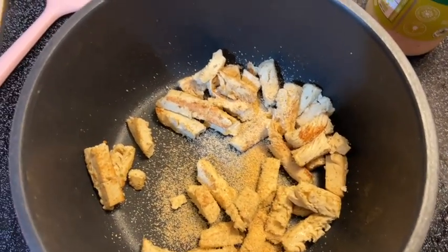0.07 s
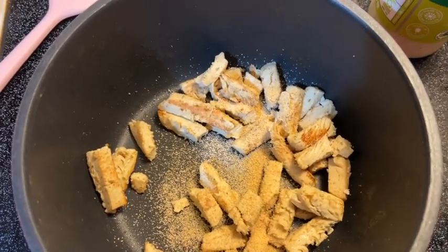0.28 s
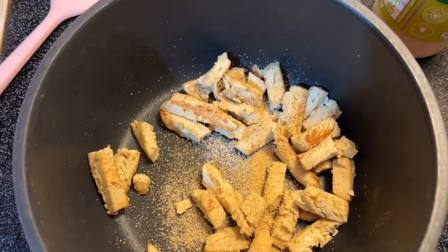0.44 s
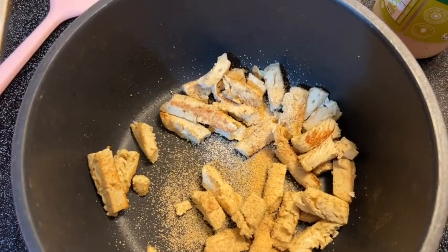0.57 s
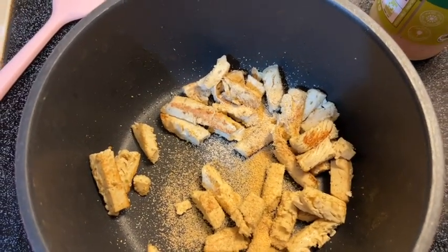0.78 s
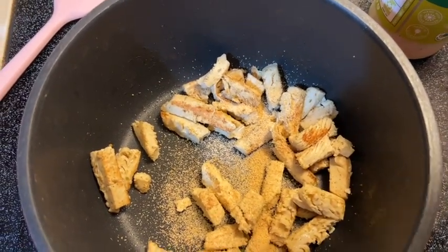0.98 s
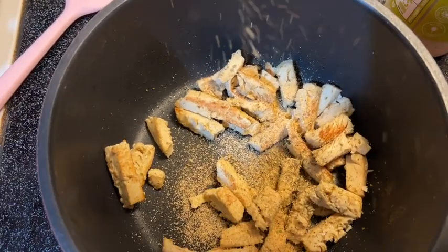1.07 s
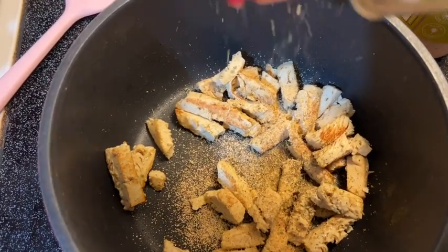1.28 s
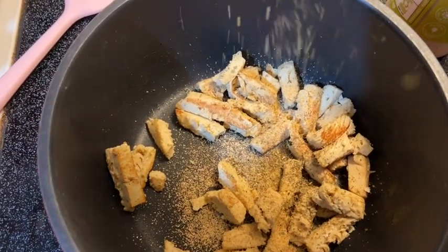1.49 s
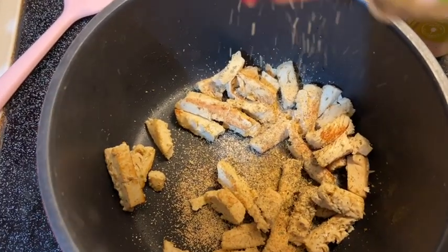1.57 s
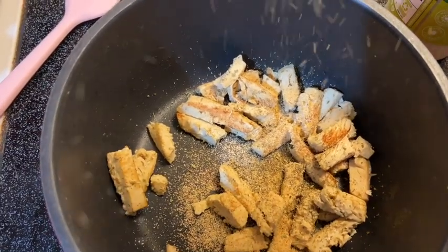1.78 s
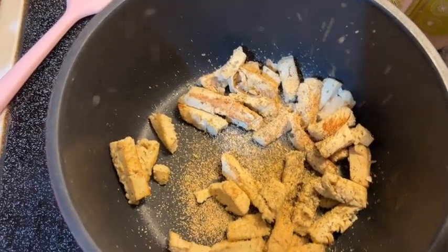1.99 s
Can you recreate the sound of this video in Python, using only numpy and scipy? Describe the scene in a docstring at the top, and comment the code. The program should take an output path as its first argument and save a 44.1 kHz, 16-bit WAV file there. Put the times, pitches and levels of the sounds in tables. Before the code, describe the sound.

Spice pours from a plastic shaker into a pan with a steady bright hiss and small grain ticks, after a jar knocks hard on the counter and a lid snaps open; close stereo microphone, small kitchen.

```python
"""Spice poured in a small kitchen

Close stereo microphone. A jar is set down on the counter and rocks: decaying counter modes, thuds, cracks.
A plastic shaker clicks and its lid snaps open (short noise bursts); spice slides inside, then pours into
a pan: showers of random impulses give a steady hiss and a later patter, with single ticks of coarse grains.
A small kitchen answers with a short noise tail, over quiet air and a faint low sine hum of uneven level."""
import sys
import numpy as np
from scipy import signal
from scipy.fft import rfft, irfft, next_fast_len
from scipy.io import wavfile
from scipy.ndimage import uniform_filter1d, map_coordinates

SR = 44100
rng = np.random.default_rng(int(sys.argv[2]) if len(sys.argv) > 2 else 0)


def store_wav(level_fs):
    """Save 16-bit WAV to argv[1]."""
    pcm = np.round(np.clip(np.atleast_2d(level_fs), -1, 1) * 32767)
    wavfile.write(sys.argv[1], SR, pcm.T.astype(np.int16))


N = 90404  # length in samples

# Colours below are relative: each sound's overall level is set apart from its colour.
# Pour: flow out of the shaker [t/s, level/dB before stream or patter gain]
POUR_FLOW = [(1.065, -79.5), (1.084, -51.5), (1.108, -42.5), (1.149, -46), (1.301, -46), (1.4, -47),
             (1.5, -46.5), (1.68, -47.5), (1.801, -47), (2.04, -47.5)]
# Colour of the falling stream [f/Hz, level/dB]
STREAM_COLOUR = [(200, -54), (1200, -49), (1600, -28.5), (2400, -19.5), (3300, -4.5), (4300, -12),
                 (4900, -8), (5400, -1.5), (6300, -4.5), (7800, 0.5), (9000, -2), (11300, 1.5),
                 (12600, -2.5), (15500, -3)]
# Colour of spice landing in the pan [f/Hz, level/dB]
PATTER_COLOUR = [(50, -3), (250, 8), (750, 2.5), (950, -11), (1200, -33.5), (1500, -1.5), (2300, 5.5),
                 (3200, -6.5), (6000, -27)]
STREAM_DB, PATTER_DB = 3.5, -26  # gains on the flow
FALL_S = 0.1  # delay from shaker to pan
STREAM_PATCHY_DB, PATTER_PATCHY_DB, SURGE_DB = 1.9, 6.5, 0.4
GRAINS_PER_S, GRAIN_SPREAD_DB = 22000, 1  # per channel; mean of the size spread before its cap

# Spice sliding in the shaker [t/s, length/s, level/dB, wall rustle/dB before trim, release t60/s]
SLIDES = [(0.46, 0.01393, -49.5, -6, 0.089), (0.487, 0.034, -50, 5, 0.12), (0.703, 0.0324, -47.5, 3, .08),
          (1, 0.031, -44.5, -3.5, 0.047), (1.031, .034, -50.5, 1.5, 0.012), (1.198, .05, -53, 7, 0.094),
          (1.257, 0.036, -56.5, 4, .09), (1.402, 0.027, -58.5, 0.5, 0.049), (1.452, 0.014, -52, -3, .06),
          (1.781, 0.01, -59, -3.5, .06), (1.994, 0.044, -68, 14, .08), (2.035, .03, -55.5, 15, 0.072)]
# Colour of the sliding spice [f/Hz, level/dB]
SLIDING_COLOUR = [(1000, -35), (2200, -3.5), (3300, 1), (4900, -6), (6500, -0.5), (8000, 1), (11000, -3.5),
                  (13000, -22), (15500, -25.5)]
# Colour of the rustling shaker wall [f/Hz, level/dB]
WALL_COLOUR = [(100, -22), (350, -0.5), (750, 5), (1150, -10.5), (1600, 5), (2600, -12), (5000, -12),
               (10000, -51)]
SLIDE_RISE_S, SLIDE_SAG_DB_PER_S = 0.008, 64.5  # the spice loses speed as it slides
SLIDE_CLUMP_DB, WALL_TRIM_DB = 1.5, -8.5

# Coarse grains striking plastic [t/s, level/dB, tilt/dB per octave]
TICKS = [(.4728, -32, 4), (.4932, -29, -2), (.5178, -28, 4), (1.0069, -32, 0), (1.0093, -30, 0),
         (1.1082, -34, 0), (1.1346, -28.5, 1), (1.1736, -34, 3), (1.1912, -33, 2), (1.2046, -34, -5),
         (1.2281, -24, -1), (1.3452, -29.5, 2), (1.4485, -21, 2), (1.4627, -30, -5), (1.4989, -26.5, 3),
         (1.6084, -28.5, 0), (1.7724, -27, -1), (1.779, -30, -2), (1.7885, -30, 0), (1.855, -29.5, -2),
         (2.008, -33, 2)]
# Colour of a grain strike before tilt [f/Hz, level/dB]
GRAIN_COLOUR = [(100, -60), (500, -34), (1200, -32), (2200, -10), (3300, -2), (5000, -4), (8000, 0),
                (11000, -1), (13000, -14), (15000, -22)]
TICK_S, TICK_PIVOT_HZ = 0.002, 6000  # t60 of the rough tail; centre of the tilt

# Clicks of the shaker and its lid [t/s, level/dB, tilt/dB per octave]
SNAPS = [(.1272, -41, 9), (.3858, -34, 4), (.4093, -44, 5), (.7432, -15.5, 0), (.8269, -45, 8),
         (.9763, -49, 9)]
# Colour of the lid before tilt [f/Hz, level/dB]
LID_COLOUR = [(150, -26.5), (500, 3), (1100, -1), (2500, 0), (4200, -1), (5300, -6), (6500, -3.5),
              (8600, -6), (11000, -12), (14000, -32.5)]
SNAP_S, LID_RING_S, LID_RING_DB = 0.0073, 0.069, -10.5  # two t60s; ring relative to snap

# Soft hollow bump as the pour begins [t/s, level/dB, f/Hz, t60/s]
HOLLOW = (1.107, -52, 515, .075)
HOLLOW_RISE_HZ_PER_S, HOLLOW_ROUGH_RAD = 1200, 0.5

# Modes of the counter under the jar, before random variation [f/Hz, level/dB, t60/s]
COUNTER_MODES = [(137, -6, 0.15), (194.8, -12, 0.059), (256, 2, 0.08), (298, -3.5, 0.089),
                 (353.5, -4.5, .055), (419.7, -6.5, 0.075), (542, -16.5, 0.095), (577.6, -15, 0.095),
                 (657, -25, 0.056), (837, -28.5, 0.079), (1230, -38.5, 0.024), (1490, -36.5, .06),
                 (2004, -33.5, .06)]
# Dull knocks [t/s, ring level/dB, ring tilt/dB per octave, thud f/Hz, thud level/dB, left-right/dB]
KNOCKS = [(0.2011, -37, 16, 404, -33.5, 0.5), (0.2109, -6, 3.5, 309, -13.5, 1),
          (0.3182, -31, 10, 373.3, -32.5, 1.5), (0.3425, -41.5, -3, 468, -25, 2.5),
          (0.356, -42.5, -8.5, 200.4, -34.5, 4.5), (0.382, -44, -2.5, 191.7, -42.5, 7),
          (.407, -54, 0, 87.6, -56, 3.5), (0.496, -70, -8, 287, -50, -1.5), (.548, -45, 17, 535, -44, 1.5),
          (0.5619, -39.5, 0, 183.5, -40, 4.5), (0.6732, -59.5, 15.5, 690, -45, 6.5),
          (0.682, -44.5, 0, 212, -44.5, 3)]
SOFT_S = 0.0018  # time constant of a soft onset
LOW_CUT_HZ = 240  # high-pass corner of the ringing modes
THUD_RISE_CYCLES = 1  # cycles until a thud's envelope peaks
MODE_SCATTER = 0.041  # largest random fractional shift of a mode

# Hard contacts of jar and fingers, before trim
# [t/s, crack level/dB, ring f/Hz, ring level/dB, left-right/dB]
CLACKS = [(0.2088, -7.5, 2032, -18.5, -10), (0.3133, -49, 1864, -24.5, 3.5), (0.3157, -52, 5630, -28.5, 3),
          (0.325, -41.5, 3800, -20, -3), (0.342, -48, 1680, -35, 3.5), (0.5527, -57, 1830, -26.5, 1),
          (0.675, -52, 2160, -36.5, -1)]
# Colour of a crack [f/Hz, level/dB]
CRACK_COLOUR = [(200, -22.5), (800, -5.5), (1180, 6), (1330, 5), (1470, 9), (1750, -1), (2050, 1),
                (2800, -3), (3800, -7.5), (4700, -19), (5400, -5.5), (6200, -8), (7000, -25), (10000, -29),
                (14000, -45.5)]
CRACK_S, RING_S, RING_ROUGH = 0.021, 0.017, 0.15  # two t60s; roughness of the ring's tail
RING_SKIRT_DB = -61  # one octave either side of the ring
CLACK_TRIM_DB = -5.0

# Phase turn between left and right, by frequency [f/Hz, turn/rad each side]
CHANNEL_TURN = [(200, 0.17), (600, 0.28), (1500, 0.42), (4000, .25), (6500, 0.16), (8000, 0.42),
                (11000, 0.83), (13000, 1.8)]
# Decay of the small kitchen [f/Hz, t60/s]
KITCHEN_DECAY = [(120, 0.18), (400, 0.18), (2000, 0.21), (6000, 0.18), (12000, .2)]
# Likeness of left and right in the room tail [f/Hz, correlation]
ROOM_ALIKE = [(150, 1), (500, 0.56), (3000, 0.99), (8000, 0.58), (12000, -0.3)]
# Side over mid level of the hiss sounds, by frequency; the top is almost all side [f/Hz, level/dB]
SIDE_OVER_MID = [(200, -6.5), (1500, -12.5), (3500, -41), (5000, 3), (6500, -36), (7800, -11), (9000, -2.5),
                 (11500, 4.5), (12300, 17), (13000, 45.5)]

# Colour of the quiet air [f/Hz, level/dB]
AIR_COLOUR = [(30, -15.5), (60, -1), (200, -4), (400, -10), (800, -6.5), (1150, -16), (1600, -11),
              (3500, -2), (4800, -6.5), (6500, -1), (7800, 3), (8600, -3), (11000, 2.5), (15000, -6)]
# Level of the air [t/s, level/dB]
AIR_LEVEL = [(0, -60.5), (.07, -66), (.4, -61.5), (.85, -64.5), (1.055, -62.5), (1.075, -66), (1.2, -64.5),
             (2.04, -66.5)]
# Peak level of the hum, before random variation [t/s, level/dB]
HUM_LEVEL = [(0, -112), (.15, -69), (1.0, -77.5), (1.1, -96), (1.2, -72.5), (1.42, -74), (1.53, -65),
             (1.651, -73), (1.701, -87), (1.76, -71), (2.04, -73.5)]
HUM_HZ = 154.6

MIC_PEAK_HZ, MIC_WIDTH_HZ, MIC_PEAK_DB = 7880, 66, 6  # width is from centre to half the dB gain
TOP_HZ = 15800  # band limit


def amp(db):
    """Decibels to gain."""
    return 10 ** (np.asarray(db) / 20)


def unit(x):
    """x at rms 1."""
    return x / np.sqrt(np.mean(x ** 2) + 1e-20)


def along(points, hz):
    """Interpolate (f/Hz, value) points on a log frequency axis."""
    f, v = np.transpose(points)
    return np.interp(np.log(hz + 1), np.log(f + 1), v)


def over_time(points, t):
    """Interpolate (t/s, value) points."""
    return np.interp(t, *np.transpose(points))


def since(s):
    """Seconds since s, zero before it."""
    return np.maximum(np.arange(N) / SR - s, 0)


def fade(t, t60):
    """Exponential decay by 60 dB in t60 seconds."""
    return np.exp(-np.log(1000) * t / t60)


def soft_onset(t):
    """Smooth rise from zero to one."""
    return 1 - np.exp(-t / SOFT_S)


def wobble(rate):
    """A smooth random curve, rate knots a second."""
    knots = rng.standard_normal(int(N * rate / SR) + 4)
    return map_coordinates(knots, [np.arange(N) * rate / SR])


def filtered(x, response):
    """x times a complex response of frequency."""
    m = next_fast_len(N + SR // 2)
    return irfft(rfft(x, m) * response(np.fft.rfftfreq(m, 1 / SR)), m)[..., :N]


def coloured(x, spectrum, size=2048):
    """x through a causal minimum-phase filter of unit energy."""
    cepstrum = irfft(np.log(amp(along(spectrum, np.fft.rfftfreq(size, 1 / SR)))))
    # folding the cepstrum forward puts the energy as early as it can go
    cepstrum[1:size // 2] *= 2
    cepstrum[size // 2 + 1:] = 0
    h = irfft(np.exp(rfft(cepstrum)))
    return signal.fftconvolve(x, h / np.linalg.norm(h))[:N]


def burst(s, t60, rough=0.48):
    """A sharp contact: one push with a short rough tail."""
    t = since(s)
    x = rough * rng.standard_normal(N) * fade(t, t60) * (t > 0)
    x[round(s * SR)] = 2
    return x


def panned(x, pan_db):
    """x to both channels, left louder by pan_db."""
    return x * amp([[pan_db / 2], [-pan_db / 2]])


def spread(pair, spectrum):
    """Two unrelated signals, as mid and side, make one coloured stereo sound of rms 1."""
    def response(hz):
        turn = np.arctan(amp(along(SIDE_OVER_MID, hz)))
        return amp(along(spectrum, hz)) * [np.cos(turn), np.sin(turn)]

    mid, side = filtered(pair, response)
    return unit(np.array([mid + side, mid - side]))


def grains(spectrum):
    """A dense shower of tiny random impacts of uneven size."""
    sizes = amp(GRAIN_SPREAD_DB * np.minimum(rng.exponential(size=(2, N)), 3))
    pushes = sizes * rng.standard_normal((2, N))
    struck = rng.random((2, N)) < GRAINS_PER_S / SR
    return spread(pushes * struck, spectrum)


def patchy(pair, depth_db):
    """Patches of random gain drift through time and frequency."""
    z = signal.stft(pair, nperseg=512)[2]
    field = uniform_filter1d(rng.standard_normal(z.shape[1:]), size=7, axis=0)
    field = uniform_filter1d(field, size=9, axis=1)
    return unit(signal.istft(z * amp(depth_db * unit(field)), nperseg=512)[1][:, :N])


def kitchen(x, wet_db):
    """The channels are turned apart in phase, most in the treble, then a noise tail follows."""
    hz, t, z = signal.stft(rng.standard_normal((2, SR // 2)), SR, nperseg=256)
    # mixing mid and side by this angle gives the wanted left-right likeness
    turn = np.arccos(np.clip(along(ROOM_ALIKE, hz), -1, 1))[:, None] / 2
    decaying = z * fade(t, along(KITCHEN_DECAY, hz)[:, None])
    mid, side = signal.istft(decaying * [np.cos(turn), np.sin(turn)], SR, nperseg=256)[1]
    tail = np.array([mid + side, mid - side])
    tail = tail * (1 - np.exp(-np.arange(len(mid)) / SR / 0.0014))  # soft start, time constant 1.4 ms
    tail = tail / np.linalg.norm(tail[0])
    x = x * np.ones((2, 1))
    direct = filtered(x, lambda f: np.exp(1j * np.outer([1, -1], along(CHANNEL_TURN, f))))
    room = signal.fftconvolve(x.mean(axis=0)[None], tail, axes=1)[:, :N]
    return direct + amp(wet_db) * room


def pour():
    """Fine spice streams out of the shaker in clumps and patters into the pan a moment later."""
    def flow(delay):
        s, db = np.transpose(POUR_FLOW)
        level = np.interp(since(0) - delay, s, db, left=-120)
        return amp(level + SURGE_DB * wobble(37))

    stream = amp(STREAM_DB) * flow(0) * patchy(grains(STREAM_COLOUR), STREAM_PATCHY_DB)
    patter = amp(PATTER_DB) * flow(FALL_S) * patchy(grains(PATTER_COLOUR), PATTER_PATCHY_DB)
    return stream + patter


def slides():
    """Each move of the shaker sends the spice along its wall, losing level as it slows."""
    hiss, wall = np.zeros(N), np.zeros(N)
    for s, length, db, wall_db, release in SLIDES:
        t = since(s)
        move = amp(db - SLIDE_SAG_DB_PER_S * t) * np.minimum(t / SLIDE_RISE_S, 1)
        move = move * fade(since(s + length), release)
        hiss += move
        wall += amp(wall_db + WALL_TRIM_DB) * move
    clumps = amp(SLIDE_CLUMP_DB * wobble(220))
    return kitchen(hiss * clumps * grains(SLIDING_COLOUR) + wall * grains(WALL_COLOUR), wet_db=-28.0)


def ticks():
    """Coarse grains strike the plastic as short bursts, each with its own brightness."""
    out = np.zeros(N)
    for s, db, tilt in TICKS:
        colour = [(hz, level + tilt * np.log2(hz / TICK_PIVOT_HZ)) for hz, level in GRAIN_COLOUR]
        out += amp(db) * coloured(burst(s, TICK_S), colour)
    return kitchen(out, wet_db=-23)


def lid():
    """The shaker clicks in the hand and its lid snaps open: a sharp burst over a longer, weaker one."""
    out = np.zeros(N)
    for s, db, tilt in SNAPS:
        # a positive tilt thins the click below 5 kHz
        colour = [(hz, level + tilt * min(np.log2(hz / 5000), 0)) for hz, level in LID_COLOUR]
        contact = burst(s, SNAP_S) + amp(LID_RING_DB) * burst(s, LID_RING_S)
        out += amp(db) * coloured(contact, colour)
    return kitchen(out, wet_db=-14.5)


def bump():
    """A soft, blurred hollow note that rises as the shaker tips over."""
    s, db, hz, t60 = HOLLOW
    t = since(s)
    phase = 2 * np.pi * (hz + HOLLOW_RISE_HZ_PER_S * t / 2) * t + HOLLOW_ROUGH_RAD * wobble(210)
    return kitchen(amp(db) * np.sin(phase) * fade(t, t60) * soft_onset(t), wet_db=-1.5)


def counter_ring(t, tilt):
    """Decaying sine modes of the counter, tilted about its main one, each shifted slightly at random."""
    main_hz = COUNTER_MODES[2][0]
    ring = np.zeros(N)
    for hz, level, t60 in COUNTER_MODES:
        tilted_db = level + rng.normal(0, 1) + tilt * min(np.log2(hz / main_hz), 1)
        mode_hz = hz * (1 + MODE_SCATTER * rng.uniform(-1, 1))
        ring += amp(tilted_db) * fade(t, t60) * np.sin(2 * np.pi * mode_hz * t)
    low_cut = signal.butter(2, LOW_CUT_HZ, "high", fs=SR, output="sos")
    return signal.sosfilt(low_cut, ring * soft_onset(t))


def knocks():
    """Each blow of the jar gives a dead thud and rings the counter."""
    out = np.zeros((2, N))
    for s, db, tilt, thud_hz, thud_db, pan_db in KNOCKS:
        t = since(s)
        rise = t * thud_hz / THUD_RISE_CYCLES
        thud = (rise * np.exp(1 - rise)) ** 2 * np.sin(2 * np.pi * thud_hz * t)
        out += panned(amp(db) * counter_ring(t, tilt) + amp(thud_db) * thud, pan_db)
    return kitchen(out, wet_db=-7.5)


def clacks():
    """Hard contacts: a broad crack and a brief rough ring, each ring at its own frequency."""
    out = np.zeros((2, N))
    for s, db, hz, ring_db, pan_db in CLACKS:
        ring_colour = [(hz / 2, RING_SKIRT_DB), (hz, 0), (hz * 2, RING_SKIRT_DB)]
        ring = coloured(burst(s, RING_S, RING_ROUGH), ring_colour)
        crack = coloured(burst(s, CRACK_S), CRACK_COLOUR)
        out += panned(amp(CLACK_TRIM_DB) * (amp(db) * crack + amp(ring_db) * ring), pan_db)
    return kitchen(out, wet_db=-8.5)


def background():
    """Quiet air, as coloured noise whose level drifts, and a low sine hum following a level curve."""
    t = since(0)
    air = amp(over_time(AIR_LEVEL, t)) * spread(rng.standard_normal((2, N)), AIR_COLOUR)
    tone = np.sin(2 * np.pi * HUM_HZ * t + 0.5 * wobble(59))
    hum = tone * amp(over_time(HUM_LEVEL, t) + wobble(18))
    return air + hum


def scene():
    """All sources together."""
    return pour() + slides() + ticks() + lid() + bump() + knocks() + clacks() + background()


def record(dry):
    """The microphone lifts one narrow treble band; nothing is kept above the band limit."""
    def response(hz):
        peak_db = MIC_PEAK_DB / (1 + ((hz - MIC_PEAK_HZ) / MIC_WIDTH_HZ) ** 2)
        return amp(peak_db) * (hz < TOP_HZ)

    return filtered(dry, response)


dry = scene()
out = record(dry)
store_wav(out)
```